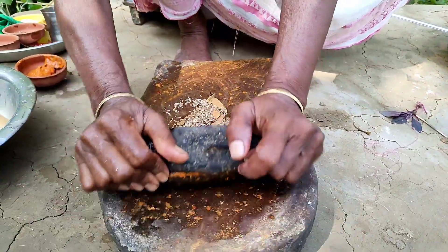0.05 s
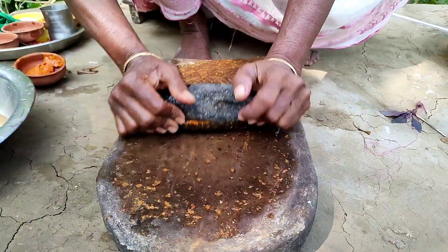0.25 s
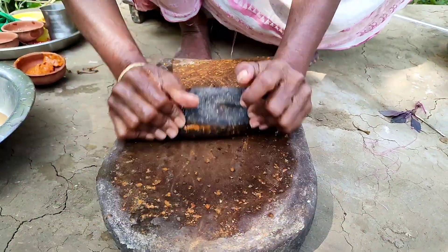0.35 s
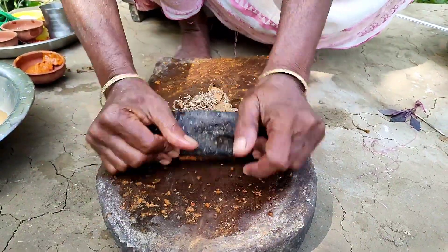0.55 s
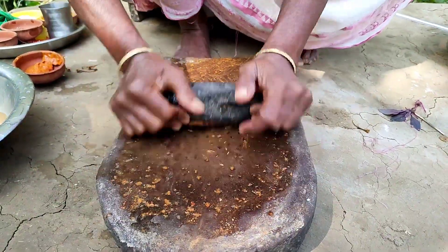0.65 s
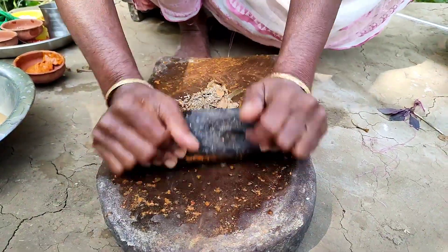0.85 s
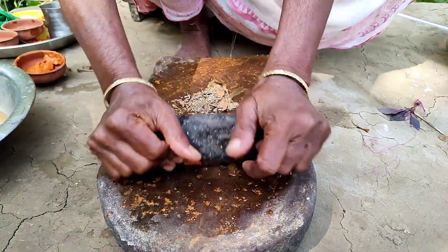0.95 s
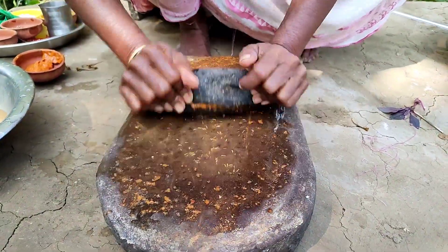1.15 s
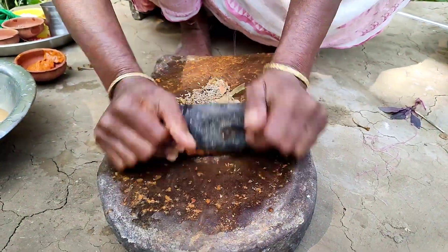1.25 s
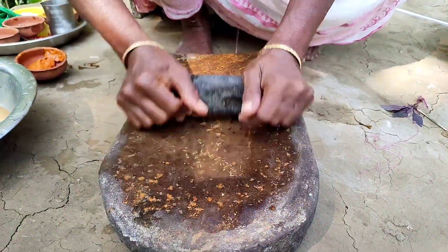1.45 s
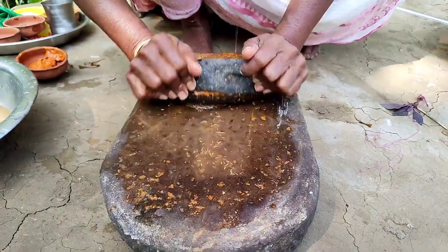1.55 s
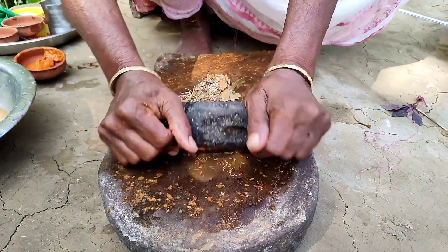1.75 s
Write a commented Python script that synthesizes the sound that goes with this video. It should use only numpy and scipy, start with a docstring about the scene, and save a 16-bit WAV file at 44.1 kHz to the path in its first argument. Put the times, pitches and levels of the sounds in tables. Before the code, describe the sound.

Close, dry scraping of stone against stone over gritty seeds, about five or six strokes a second, with a sharp clack and crackle near the half second, later seed pops and dull thuds, faint outdoor air and hiss behind.

```python
"""In a yard, close to the microphone, a stone roller is pushed and drawn over a stone slab strewn with spice.
Each stroke breaks grit, made from random clicks; in the early strokes the stones also judder, as noise moved
to a wandering pitch. Knocks, groans and sung notes ring the stones; seeds and husks burst in runs of clicks.
Bumps over the paste make the slab thud. A short echo follows, and faint air and hiss lie behind."""
import sys
import numpy as np
from scipy import signal
from scipy.fft import rfft, irfft, next_fast_len
from scipy.io import wavfile
from scipy.ndimage import uniform_filter1d

SR = 44100
rng = np.random.default_rng(int(sys.argv[2]) if len(sys.argv) > 2 else 0)


def store_pcm(level_fs):
    """Save levels as 16-bit WAV."""
    pcm = np.round(np.clip(level_fs, -1, 1) * 32767).astype(np.int16)
    wavfile.write(sys.argv[1], SR, np.atleast_2d(pcm).T)


N = 79380
TAPS = 8192  # length of filters and short sounds, in samples

# Strokes of the roller. Each row: start, fastest moment and stop in seconds,
# then the top level of grit, fine crunch and bare stone in dB.
STROKES = [(-.02, 0.05, 0.045, -58.5, -77, -52), (0.007, 0.265, 0.38, -46, -57, -43),
           (0.366, 0.397, 0.46, -47, -70, -54.5), (0.447, 0.519, 0.64, -46.5, -54, -48.5),
           (0.622, 0.796, 0.877, -48, -63, -54), (0.867, 0.903, 1.02, -44, -52.5, -62),
           (0.9, 0.977, 1.095, -72, -59.5, -51.5), (1.07, 1.205, 1.258, -46.5, -59.5, -54.5),
           (1.264, 1.344, 1.45, -43, -53, -47), (1.409, 1.6, 1.677, -49, -61.5, -52),
           (1.679, 1.76, 1.9, -43.5, -50, -48)]
GRIT_SHAPE, CRUNCH_SHAPE = 1.25, 2.2  # level follows speed to these powers
GRAINS_PER_S, GRAIN_SPREAD_DB = 3000, 4.5
GRIT_PATCHY_DB, GRIT_PATCHY_RATE = 2.5, 24  # size of the wavering, and its rough rate per second
CRUNCH_PATCHY_DB, CRUNCH_PATCHY_RATE = 3, 91
GRIT_SCATTER_DB = -0.5
# Tone of the scraping grit. Each row: frequency in Hz, level in dB.
GRIT_TONE = [(300, -31.5), (1000, -8), (1650, -11), (2200, 3), (3000, 2.5), (3900, 3), (4500, 2),
             (5000, -12), (5600, -16), (6500, -9), (7400, -18), (15000, -78)]
# Tone of the fine crunch. Each row: frequency in Hz, level in dB.
CRUNCH_TONE = [(2000, -4.5), (4200, -13), (5000, 0), (5600, 10), (6600, 11), (7800, -5), (10000, 0),
               (13000, -2.5), (15500, -7)]

# How roller and slab ring. Each row: frequency in Hz, level in dB, time to fade by 60 dB in seconds.
STONE_MODES = [(674, -3, 0.033), (834, -13, 0.084), (959, -4.5, 0.026), (1323, 1, .05), (1695, 0.5, 0.0097),
               (1782, -8, 0.06), (2066, -4.5, 0.014), (2478, 4, 0.013), (3320, -3.5, 0.026),
               (3700, -6, 0.0082), (4530, -22.5, 0.036), (6170, -22.5, 0.015)]
# Force of steady rubbing. Each row: frequency in Hz, level in dB.
RUB_FORCE = [(600, 4), (1000, -7.5), (1350, 4.5), (1700, 6), (2400, 7), (3300, -12), (6200, 21)]
# The small stones give off little bass. Each row: frequency in Hz, level in dB.
RADIATION = [(60, -22), (300, -16), (450, -5.5), (620, -2.5), (3000, 0)]
# Knocks of stone on stone. Each row: time in seconds, level in dB before halving,
# treble limit of the contact in Hz, share of the full ringing time.
KNOCKS = [(.0225, -22, 880, 0.78), (0.076, -21, 1010, 0.33), (.279, -23.5, 2460, 0.77),
          (.5283, -21.5, 5940, .7), (0.5455, -23, 4400, 1), (.4968, -16, 4500, .6), (.5182, -18, 3800, .8),
          (.5579, -7, 4860, .7), (.56092, -8, 3600, .6), (.56393, -22, 3000, .7), (0.742, -28, 1400, 1),
          (0.761, -27.5, 1420, 1.0), (.9785, -16.5, 1070, 0.72), (.9815, -29.5, 1330, 1.0)]
# Chatter of the bare stones. Each row: start in seconds, length in seconds, level in dB,
# treble limit of the contact in Hz.
CHATTERS = [(0.523, 0.034, -34.5, 2900), (0.667, 0.057, -50, 1320)]
CHATTER_PER_S = 450

# Judder of the stones. Each row: time in seconds, level in dB, pitch of the contact in Hz.
JUDDER = [(0, -44, 625), (0.015, -47.5, 690), (0.025, -36.5, 584), (0.051, -49, 723), (0.067, -46, 704),
          (0.08, -35.5, 714), (.15, -34.5, 774), (0.208, -35.5, 780), (0.224, -40, 740), (0.248, -36, 732),
          (0.291, -32, 724), (0.317, -45, 580), (0.338, -42, 546), (.37, -65, 574), (.51, -80, 880),
          (0.534, -33.5, 824), (0.556, -33.5, 764), (.63, -69, 700), (0.676, -52.5, 707),
          (.698, -48.5, 660), (.713, -41, 560), (.735, -65, 520)]
JUDDER_WIDTH_HZ, JUDDER_OVERTONE_DB, JUDDER_PAN_DB = 171, -14, 3  # positive pan leans left

# The dragging roller groans briefly. Each row: start in seconds, length in seconds, level in dB.
GROANS = [(.005, 0.023, -51.5), (0.063, 0.039, -63), (0.241, 0.032, -55), (1.405, 0.035, -61.5),
          (1.482, 0.064, -66)]
GROAN_HZ, GROAN_T60_S = 321, 0.16
# Rubbing makes single notes of the stones sing. Each row: start in seconds, length in seconds,
# level in dB before the shared lift, pitch in Hz.
SINGS = [(.21, .1, -45, 3340), (.08, .15, -57, 6500), (.74, .03, -57, 465), (.765, .025, -42, 1260),
         (.768, .024, -46, 1675), (.87, .07, -53, 1330)]
SING_T60_S, SING_LIFT_DB = 0.054, 1.0

# Dry husks crackle under the hard push. Each row: start in seconds, decay in seconds,
# level in dB before scatter, middle frequency in Hz.
CRACKLES = [(0.4694, 0.0037, -57.5, 7800), (0.4983, 0.0028, -57, 8500), (0.512, 0.0042, -49.5, 9300),
            (.5235, 0.003, -54, 6460), (.538, .01, -60, 11100), (0.557, 0.0023, -42.5, 4240)]
CRACKLE_PER_S = 1200

# Seeds bursting under the roller. Each row: time in seconds, level in dB, middle frequency in Hz,
# reach to either side in octaves.
SEEDS = [(1.0465, -21.5, 1530, 1.14), (1.3607, -29.5, 3860, 0.19), (1.4401, -35.5, 690, 0.47),
         (1.556, -48, 495, 0.13), (0.92, -33, 4650, 0.08), (1.171, -43.5, 5640, 0.087)]
SEED_ATTACK_S, SEED_DECAY_S, SEED_CLICK_GAP_S = 0.00066, 0.0027, 0.0008  # the gap is a rough one
# Tone of a bursting seed. Each row: frequency in Hz, level in dB.
SEED_TONE = [(300, -22), (520, -4), (720, 5), (1000, -10.5), (1250, -22.5), (1600, -0.5), (1950, -4),
             (2400, -16), (2900, -11), (3350, 8), (4300, -43), (5600, -31), (9000, -76)]

# The roller bumps over lumps of paste. Each row: start in seconds, length in seconds, level in dB.
BUMPS = [(.008, 0.018, -52), (.245, 0.025, -64), (.36, 0.027, -55.5), (.53, 0.013, -45), (.755, 0.025, -48),
         (.958, 0.027, -51.5), (1.11, 0.019, -51.5), (1.175, 0.048, -48.5), (1.30, 0.045, -59.5),
         (1.365, 0.022, -48), (1.40, 0.019, -50), (1.51, 0.048, -51), (1.552, 0.053, -44.5),
         (1.738, 0.031, -54), (1.77, 0.015, -40.5)]
# How the slab thuds on the ground. Each row: frequency in Hz, level in dB,
# time to fade by 60 dB in seconds.
SLAB_MODES = [(138.6, -1.5, 0.089), (190.6, 3.5, 0.094)]
# Softness of the bump. Each row: frequency in Hz, level in dB.
BUMP_FORCE = [(50, -2), (110, -4.5), (150, 0), (210, 1), (270, -5), (330, -3), (420, -9), (900, -1)]
# A hard knock shakes the ground. The one row: start in seconds, length in seconds, level in dB.
SHAKE = (.535, .045, -57)
RUMBLE_DB = -19.5  # steady rumble of the slab, relative to the grit

# Tone of the quiet air. Each row: frequency in Hz, level in dB.
AIR_TONE = [(25, 5.5), (60, 9.5), (110, 3), (190, 5), (300, -7.5), (500, -23), (900, -4), (1400, -7),
            (3000, -9), (4500, -33), (7000, -15), (15000, -51)]
# How far the air differs between left and right. Each row: frequency in Hz, level in dB.
AIR_SIDES = [(30, -5), (150, -16.0), (900, 2.5)]
# Tone of the hiss. Each row: frequency in Hz, level in dB.
HISS_TONE = [(600, -27), (1300, -16), (2200, -1.5), (3200, 6), (4200, -8.5), (5200, -14.5), (9000, -20.5),
             (15000, -25)]
AIR_DB, HISS_DB, HISS_PAN_DB = -60, -56, -6  # negative pan leans right

# Left minus right at the microphone. Each row: frequency in Hz, difference in dB.
BALANCE = [(60, -1), (180, -2.5), (330, 2), (1300, 2), (2400, -.3), (4400, -3), (8000, -4.5), (15000, -11)]
# The left ear hears each sound first; the right lags by this many samples.
GRIT_LAG, STONE_LAG, LOW_LAG = 16.118511, 7.698214, 4.591605
YARD_T60_S, YARD_DB = 0.095, -21
TOP_HZ = 15400


def undb(db):
    """Turn decibels into a gain."""
    return 10 ** (np.asarray(db) / 20)


def unit(x):
    """Scale to an average (rms) level of 1."""
    return x / np.sqrt(np.mean(x ** 2) + 1e-20)


def clock():
    """Time of every sample in seconds."""
    return np.arange(N) / SR


def bins():
    """Frequencies of the filter grid in Hz."""
    return np.maximum(np.fft.rfftfreq(TAPS, 1 / SR), 1)


def through(x, response):
    """Pass a sound through a filter."""
    size = next_fast_len(x.shape[-1] + TAPS, True)
    filtered = irfft(rfft(x, size) * rfft(irfft(response), size), size)
    return filtered[..., :x.shape[-1]]


def along(points):
    """Join (Hz, dB) points into a curve on the filter grid."""
    hz, db = np.array(points, float).T
    return np.interp(np.log(bins()), np.log(hz), db)


def causal(db):
    """Turn a level curve into a filter that reacts as early as it can (minimum phase)."""
    cepstrum = irfft(np.log(undb(db)))
    cepstrum[1:TAPS // 2] *= 2
    cepstrum[TAPS // 2 + 1:] = 0
    return np.exp(rfft(cepstrum))


def soft(cut_hz):
    """A soft contact passes less treble."""
    ratio = bins() / cut_hz
    return 1 / (1 + 1j * np.sqrt(2) * ratio - ratio ** 2)


def ringing(modes, length=1):
    """A struck body rings in fading tones; neighbours in the table swing in opposite directions."""
    t = np.arange(TAPS) / SR
    total = np.zeros(TAPS)
    for k, (hz, db, t60) in enumerate(modes):
        fade = np.exp(-np.log(1000) * t / (t60 * length))
        total += (-1) ** k * undb(db) * np.sin(2 * np.pi * hz * t) * fade
    return rfft(total)


def walk(rate):
    """Smooth random wavering with an rms of 1."""
    k = max(int(SR / rate), 1)
    return unit(uniform_filter1d(uniform_filter1d(rng.standard_normal(N), k), k))


def grains(per_s, spread_db, size=N):
    """Random clicks, many small and a few large."""
    hit, energy, sign = rng.random(size), rng.exponential(size=size), rng.random(size)
    x, on = np.zeros(size), hit < per_s / SR
    x[on] = np.sign(sign[on] - .5) * undb(spread_db * np.minimum(energy[on], 5))
    return unit(x)


def spell(length, per_s, body):
    """A short run of contacts swells, fades and rings a body."""
    progress = np.minimum(np.arange(TAPS) / SR / length, 1)
    window = np.sqrt(np.abs(np.sin(np.pi * progress)))
    return irfft(rfft(grains(per_s, spread_db=3.0, size=TAPS) * window) * body)


def sized(x, length, db):
    """Give a short sound this level over its length."""
    return x * undb(db) * np.sqrt(length * SR / (np.sum(x ** 2) + 1e-20))


def add(out, at, x):
    """Mix a short sound in at a time in seconds."""
    i = int(np.clip(round(at * SR), 0, N - 1))
    out[i:i + len(x)] += x[:N - i]


def ears(x, lag, pan_db=0):
    """Make two channels, the right one later by a lag in samples."""
    whole, part = divmod(lag, 1)
    late = np.pad(x, (int(whole), 0))[:N]
    k = (1 - part) / (1 + part)  # an all-pass filter adds the part of a sample
    right = signal.lfilter([k, 1], [1, k], late)
    return np.array([x * undb(pan_db / 2), right * undb(-pan_db / 2)])


def scatter(x, t60):
    """Surfaces around throw back a blur of reflections, unrelated left and right."""
    t = np.arange(TAPS) / SR
    build_up = 1 - np.exp(-t / 0.0041)
    tail = rng.standard_normal((2, TAPS)) * np.exp(-np.log(1000) * t / t60) * build_up
    return through(x, rfft(tail / np.sqrt(np.sum(tail ** 2) / 2)))


def effort(column, shape):
    """Level of one layer: each stroke gathers speed and slows to a stop."""
    t = np.linspace(0, N / SR, 1000)
    level = np.zeros(len(t))
    for row in STROKES:
        speed = np.sin(np.pi / 2 * np.interp(t, row[:3], [0, 1, 0]))
        level += undb(row[3 + column]) * speed ** shape
    return np.interp(clock(), t, level)


def scraping():
    """Grit and fine crunch break in patches under the moving roller."""
    grit = unit(through(grains(GRAINS_PER_S, GRAIN_SPREAD_DB), causal(along(GRIT_TONE))))
    crunch = unit(through(grains(per_s=4600, spread_db=3.0), causal(along(CRUNCH_TONE))))
    grit = grit * effort(0, GRIT_SHAPE) * undb(GRIT_PATCHY_DB * walk(GRIT_PATCHY_RATE))
    crunch = crunch * effort(1, CRUNCH_SHAPE) * undb(CRUNCH_PATCHY_DB * walk(CRUNCH_PATCHY_RATE))
    x = grit + crunch
    blur = undb(GRIT_SCATTER_DB)
    return (ears(x, GRIT_LAG) + blur * scatter(x, t60=0.019)) / np.hypot(1, blur)


def stones():
    """The stones ring from steady rubbing, spells of chatter and single knocks."""
    radiated = causal(along(RADIATION))
    ring = ringing(STONE_MODES) * radiated
    rubbing = unit(through(grains(per_s=1400, spread_db=4), ring * causal(along(RUB_FORCE))))
    out = rubbing * effort(2, shape=0.83)
    for start, length, db, cut_hz in CHATTERS:
        add(out, start, sized(spell(length, CHATTER_PER_S, ring * soft(cut_hz)), length, db))
    for at, db, cut_hz, ring_share in KNOCKS:
        knock = irfft(ringing(STONE_MODES, ring_share) * radiated * soft(cut_hz))
        add(out, at, undb(db) * knock / 2)
    return ears(out, STONE_LAG) + undb(-3) * scatter(out, t60=0.02)


def judder():
    """Stones stick and slip; the slips excite the contact at a wandering pitch and its overtone."""
    at, db, hz = np.array(JUDDER, float).T
    t = clock()[:N // 2]
    phase = 2 * np.pi * np.cumsum(np.interp(t, at, hz)) / SR
    level = undb(np.interp(t, at, db)) * (t < at[-1])
    out = np.zeros(N)
    for multiple, gain in ((1, 0.91), (2, undb(JUDDER_OVERTONE_DB))):
        # shift the slips down to zero pitch, keep a narrow band, then shift back up
        slips = grains(per_s=1100, spread_db=2.5, size=len(t)) * np.exp(-1j * multiple * phase)
        band = soft(JUDDER_WIDTH_HZ * multiple / 2)
        swing = through(slips.real, band) + 1j * through(slips.imag, band)
        swing = swing / (unit(np.abs(swing)) + 2.0)  # friction limits the swing
        tone = unit((swing * np.exp(1j * multiple * phase)).real)
        add(out, 0, gain * tone * level)
    return ears(through(out, causal(along(RADIATION))), LOW_LAG, JUDDER_PAN_DB)


def singing():
    """Friction feeds one mode at a time: low groans and short notes, mostly higher."""
    low, notes = np.zeros(N), np.zeros(N)
    groan_body = ringing([(GROAN_HZ, 0, GROAN_T60_S)]) * soft(cut_hz=810)
    for start, length, db in GROANS:
        add(low, start, sized(spell(length, 1100, groan_body), length, db))
    for start, length, db, hz in SINGS:
        body = ringing([(hz, 0, SING_T60_S)]) * causal(along(RADIATION))
        add(notes, start, sized(spell(length, 900, body), length, db))
    return ears(low, LOW_LAG) + undb(SING_LIFT_DB) * ears(notes, LOW_LAG)


def husks():
    """A husk snaps sharply and crumbles in a fading run of clicks."""
    out, t = np.zeros(N), np.arange(TAPS) / SR
    for start, decay, db, centre_hz in CRACKLES:
        clicks = grains(CRACKLE_PER_S, spread_db=2.5, size=TAPS) * np.exp(-t / decay)
        clicks[0] = np.abs(clicks).max()  # the first snap
        distance = np.log2(bins() / centre_hz) / .55  # the band reaches .55 octaves either side
        colour = causal(-10 * np.log10(1 + distance ** 8))
        add(out, start, sized(irfft(rfft(clicks) * colour), decay, db))
    return ears(out, GRIT_LAG) + undb(2.5) * scatter(out, t60=0.0018)


def seeds():
    """A seed gives way in seven quick snaps that grow at first and then shrink."""
    out = np.zeros(N)
    for at, db, centre_hz, octaves in SEEDS:
        chance = rng.uniform(-0.75, 1, size=7)
        delays = SEED_CLICK_GAP_S * np.abs(np.arange(len(chance)) + 0.49 * chance)
        sizes = np.exp(-delays / SEED_DECAY_S) * (1 - 0.89 * np.exp(-delays / SEED_ATTACK_S))
        snaps = np.bincount((delays * SR).astype(int), sizes, TAPS)
        distance = np.log2(bins() / centre_hz) / octaves
        colour = along(SEED_TONE) - 10 * np.log10(1 + distance ** 4)
        add(out, at, sized(irfft(rfft(snaps) * causal(colour)), SEED_DECAY_S, db))
    return ears(out, STONE_LAG, pan_db=-4.5)


def thuds():
    """Bumps of the roller rock the slab on the ground, over a steady rumble."""
    body = ringing(SLAB_MODES) * causal(along(BUMP_FORCE))
    rumble = unit(through(grains(per_s=1500, spread_db=1.5), body))
    out = undb(RUMBLE_DB) * rumble * effort(0, shape=1.0)
    for start, length, db in BUMPS:
        add(out, start, sized(spell(length, 800, body), length, db))
    start, length, db = SHAKE
    add(out, start, sized(spell(length, 800, soft(cut_hz=26)), length, db))
    return ears(out, LOW_LAG)


def background():
    """Filtered noise: quiet air all round and a slightly wavering hiss to the right."""
    noise = rng.standard_normal((4, N))
    side = through(noise[1], causal(along(AIR_SIDES)))
    air = unit(through(noise[0] + np.array([side, -side]), causal(along(AIR_TONE))))
    pan = undb(np.array([[HISS_PAN_DB], [-HISS_PAN_DB]]) / 2)
    hiss = unit(through(noise[2:], causal(along(HISS_TONE)))) * pan
    return undb(AIR_DB) * air + undb(HISS_DB) * hiss * undb(0.81 * walk(rate=12))


def scene():
    """The grinding stone, its short echo and the background."""
    near = scraping() + stones() + judder() + singing() + husks() + seeds() + thuds()
    near = near + undb(YARD_DB) * scatter(near, YARD_T60_S)
    half = along(BALANCE) / 2
    return through(near, np.array([causal(half), causal(-half)])) + background()


def record(dry):
    """The recorder cuts the top steeply."""
    top_cut = signal.ellip(10, .2, 80, TOP_HZ, fs=SR, output="sos")
    return signal.sosfilt(top_cut, dry)


dry = scene()
out = record(dry)
store_pcm(out)
```